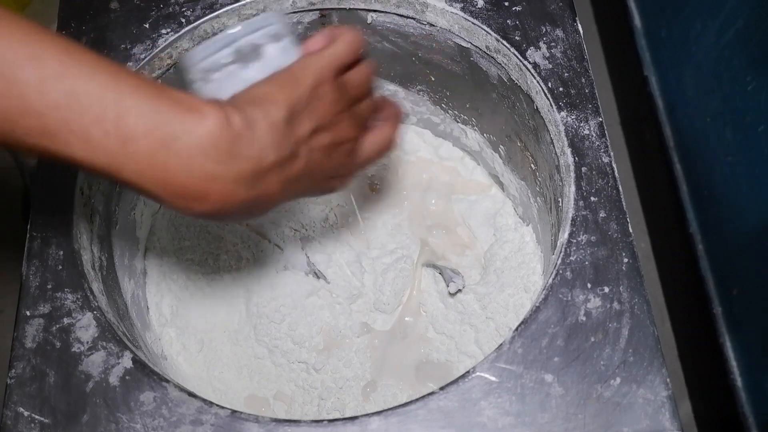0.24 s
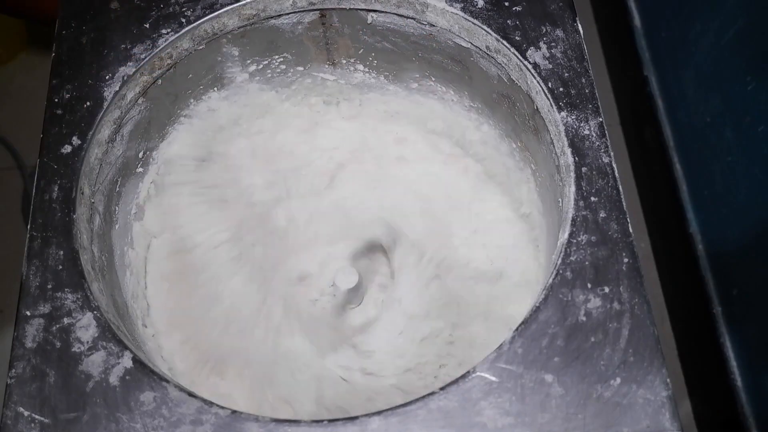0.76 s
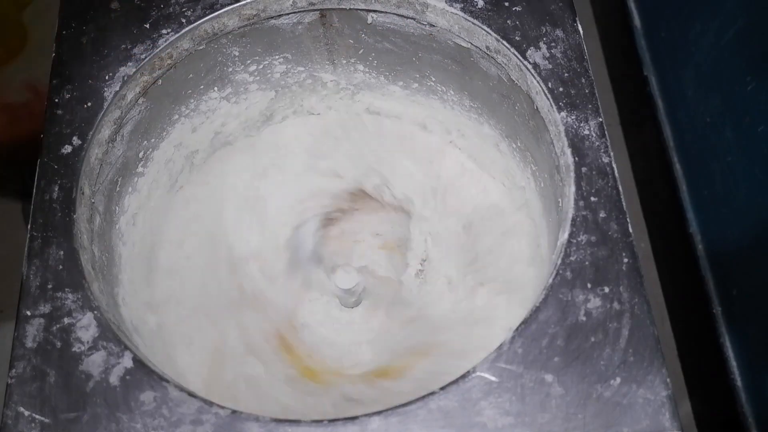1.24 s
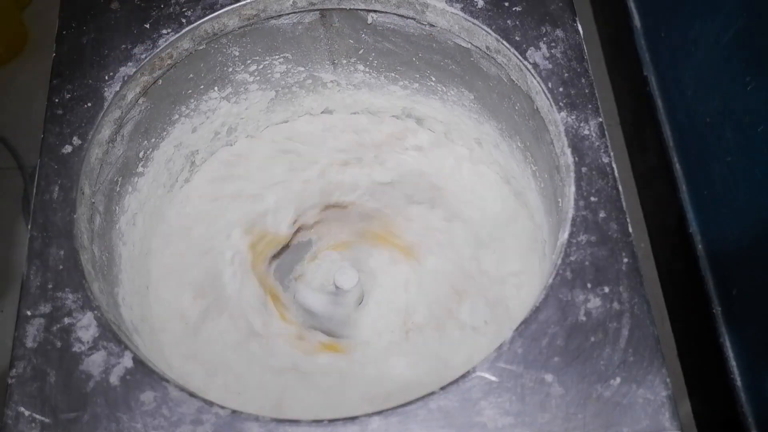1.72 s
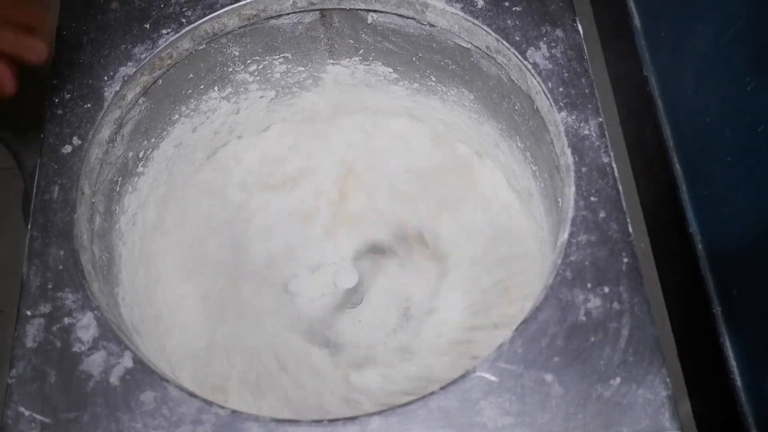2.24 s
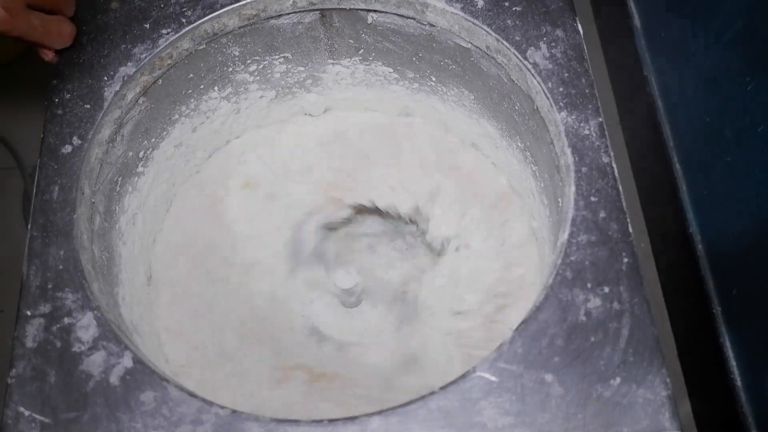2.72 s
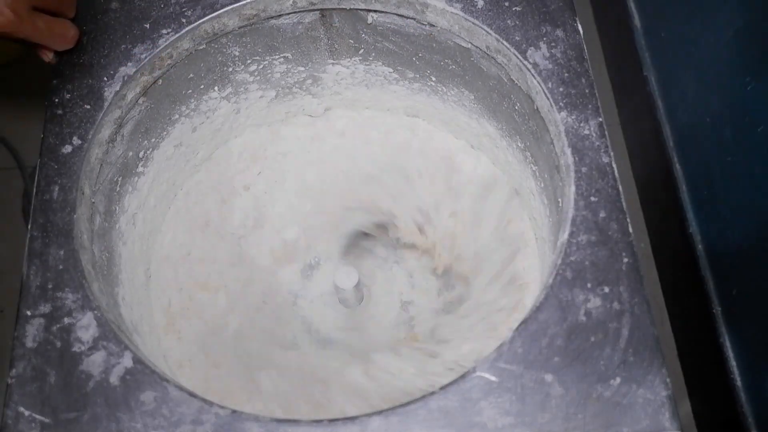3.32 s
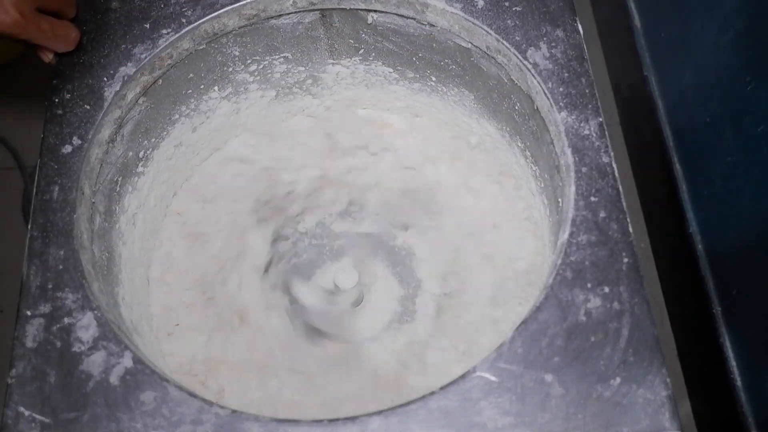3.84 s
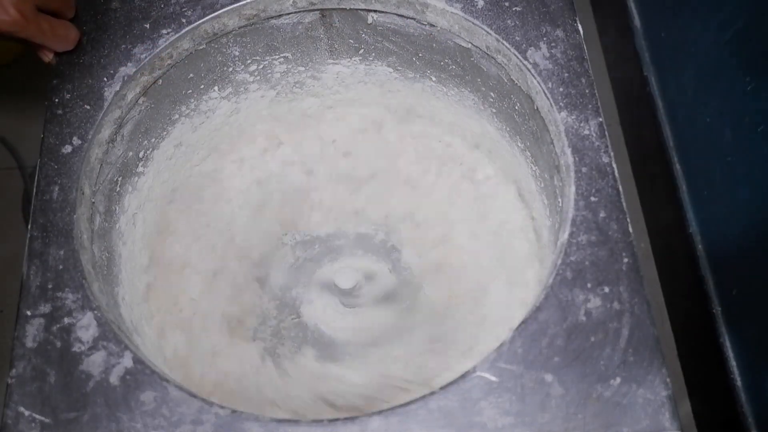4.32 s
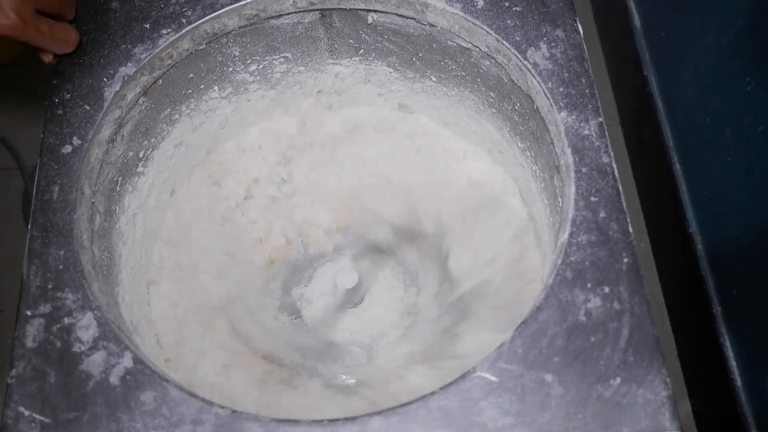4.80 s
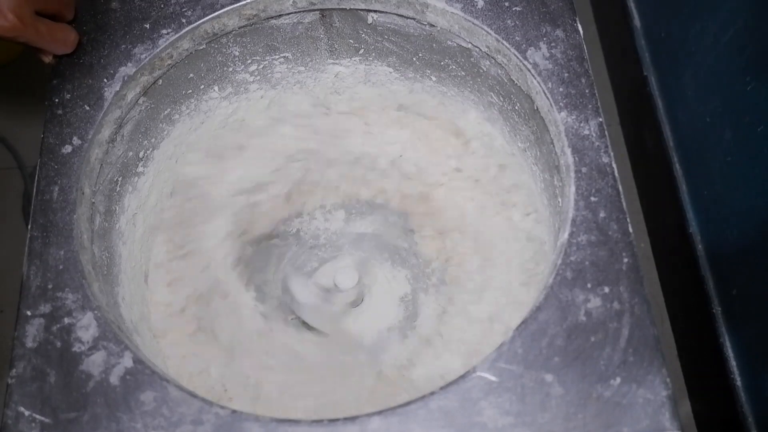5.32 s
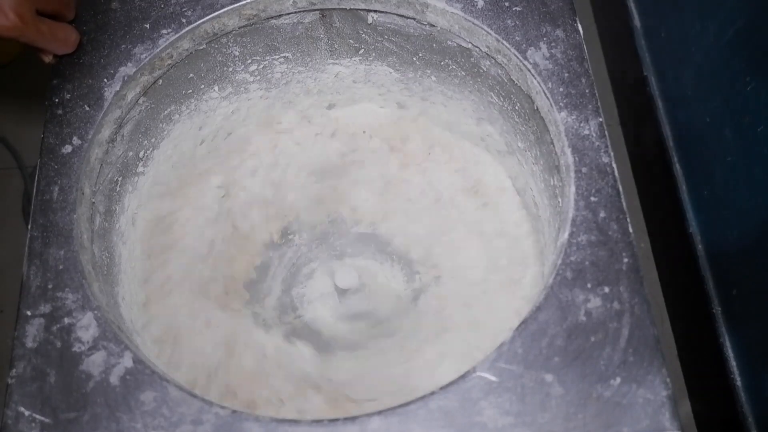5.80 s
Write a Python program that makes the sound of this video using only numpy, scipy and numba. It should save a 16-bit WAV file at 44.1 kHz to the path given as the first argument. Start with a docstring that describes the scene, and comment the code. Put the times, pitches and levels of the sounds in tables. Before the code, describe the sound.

Close up in a kitchen, a dough mixer set in a steel counter starts after some soft metallic taps, with switch clicks, a jolt and a short rush of flour. The motor then hums on steadily under quick, uneven paddle thumps and knocks, while gears whirr, loose parts clack and the metal casing rumbles and buzzes. The left side carries the body of the sound, the right mainly thin buzz.

```python
"""A dough mixer in a steel counter swells to a steady hum, made by the mains tugging at its motor.
First come taps on the steel bowl, a switch, a rush of flour and a jolt as the power comes on.
Then the paddle thumps round the bowl, the gears whirr, loose parts clack, and the sheet-metal casing
rumbles and buzzes. The left side is close and bassy; the right has mostly treble,
with faint low background noise."""
import sys
import numpy as np
from scipy import signal
from scipy.fft import rfft, irfft, next_fast_len
from scipy.io import wavfile
from scipy.ndimage import uniform_filter1d
from numba import njit

SR = 44100
rng = np.random.default_rng(int(sys.argv[2]) if len(sys.argv) > 2 else 0)


def generate_wav(signal):
    """Clip the signal to [-1, 1] and save it as 16-bit WAV at the path in sys.argv[1]."""
    frames = np.transpose(np.atleast_2d(signal))
    scaled = np.clip(frames, -1, 1) * 32767
    pcm = np.round(scaled).astype(np.int16)
    wavfile.write(sys.argv[1], SR, pcm)


N = 267412
STEP = 4  # hum and rumble are built on every fourth sample
PULL_HZ, PULL_START = 99.78, .404  # the motor's magnets pull twice per mains cycle; start is in cycles
SHAFT_HZ = 24.74  # the shaft slips behind a quarter of the pull rate

# All levels are relative. A ring time is how long a sound takes to fall by 60 dB.
# Tone shapes of the noises. Each row: pitch in Hz, level in dB.
LEFT_BACKGROUND_TONE = [(25, -53.5), (60, -23), (100, -18), (135, -8.5), (200, -4), (320, -5), (600, -9),
                        (1000, -18), (2100, -27.5), (5000, -44.5), (14000, -63)]
RIGHT_BACKGROUND_TONE = [(30, -5), (100, -3.5), (220, 1), (500, -6.5), (1000, -12), (2000, -17.5),
                         (3000, -23), (5000, -24.5), (9000, -41), (11800, -45), (12300, -51)]
TAP_TONE = [(300, -17), (650, -14), (950, 0), (1250, -1), (1600, -9), (1900, -5), (2300, -17), (4000, -25),
            (8000, -64)]
FLOUR_TONE = [(2500, 4), (4000, 1), (5000, 6.5), (7000, 0.5), (9000, 2), (11500, 0), (13000, -10.5),
              (15000, -11)]
SWITCH_TONE = [(900, -15), (1500, -7), (1750, 0), (2020, 2.5), (2200, -13), (2400, 1), (2800, -12),
               (3500, -13.5), (6000, -23), (9000, -42), (12000, -68)]
WHIRR_TONE = [(30, -26), (90, -12), (200, -11.5), (380, 1.5), (450, 0), (900, -10.5), (1600, -16),
              (3000, -27), (3900, -29.5), (5000, -62)]
BUZZ_TONE = [(3000, -5.5), (3800, -4.5), (4200, -2.5), (4450, 1.5), (4700, 0), (5200, -3.5), (5500, -0.5),
             (5760, -3), (5950, -1), (6350, -5), (6550, -5.5), (7500, -9.5), (8900, -11), (10100, -11),
             (10800, -9.5), (12000, -12), (12800, -20), (15000, -23)]
CLACK_TONE = [(400, -22.5), (650, 0), (1250, 0), (2200, -8), (3200, -21.5), (5000, -39)]
# Filters for each microphone and for treble heard only on the right. Each row: pitch in Hz, gain in dB.
LEFT_MIC = [(3000, 0), (3450, -1), (3600, -1), (3700, -8), (3900, -5), (4100, 1.5), (4400, 0.5)]
RIGHT_MIC = [(2000, -30), (3300, -10), (4000, 4), (10700, -2.5), (11200, -22.5), (11900, -9), (12300, -30),
             (15000, -34)]
RIGHT_ONLY = [(3000, -1), (4500, -5), (6500, -2), (8000, 1), (11000, 2), (12000, 3)]
# Notes that ring after a blow. Each row: pitch in Hz, level in dB, ring time in seconds.
BOWL_NOTES = [(353, 3.5, 0.26), (324, -4, 0.17), (660, -5, 0.1), (914, -1, 0.21), (1132, -9, 0.19),
              (1175, -14, 1), (1485, -14, 0.13), (1860, -16, 0.15)]
COUNTER_NOTES = [(205.5, -3.5, 0.18), (194.6, -13.5, 0.27), (308, -14, 0.15), (448.6, -15.5, 0.12),
                 (544, -17, 0.1), (623, -11, 0.061), (753, -12, 0.15), (840, -19, 0.15), (1000, -27, 0.063)]
KNOCK_NOTES = [(247, -3, 0.015), (310, -8.5, 0.04), (420, -5, 0.016), (45, -23.5, 0.062)]
# Bands where the casing and loose sheet ring. Each row: pitch in Hz, width in Hz, level in dB.
CASING_BANDS = [(105.1, 15, -20.5), (179.1, 16, 1.5), (206.6, 17, 1.5), (258.6, 32, -2), (306.8, 31.6, -1),
                (355.3, 18, -2.5), (390.2, 43, -6.5), (423, 24, -13), (466, 13, -13), (486, 16, -8),
                (514.5, 14, -4), (590, 25, -9), (626, 104, -14.5), (746, 40, -20.5), (841, 58, -16.5),
                (1114, 28, -19), (1228, 50, -17), (1278, 17, -15.5), (1645, 31, -25), (1815, 36, -23.5),
                (2210, 130, -30.5), (2605, 66, -31), (2970, 70, -38.5), (3260, 55, -35.5), (3460, 200, -42)]
SHEET_BANDS = [(4455, 40, -2), (5510, 260, 0), (6520, 200, -8), (8950, 250, -11), (10800, 350, -10)]
# Overall loudness. Each row: time in seconds, then mixer, left and right background levels in dB.
FADE = [(0, -58, -43, -61), (.2, -42, -41.5, -55), (.4, -50, -35.5, -50.5), (.55, -35, -36, -48),
        (0.679, -37, -25.5, -55.5), (0.751, -13, -30, -58.5), (.85, -5.5, -34, -60), (0.971, 0, -47, -54.5),
        (6.06, -1, -55.5, -55.5)]
# Taps on the bowl. Each row: start in seconds, level in dB, brightness from 0 to 1.
TAPS = [(0.227, -32, 0.37), (.4335, -27, 1), (.4503, -28, 0.3), (0.507, -36, 0.1)]
# The rush of flour. Each row: time in seconds, level in dB.
FLOUR_RUSH = [(.5, -82), (.55, -58), (.61, -51), (.625, -42), (.635, -29.5), (.655, -38), (.7, -45),
              (.78, -54.5), (.9, -66.5)]
# Switch clicks. Each row: start in seconds, level in dB, ring time in seconds.
CLICKS = [(0.538, -35.5, 0.2), (0.55, -31, 0.032), (.57, -36, 0.035), (0.649, -25, 0.053),
          (0.659, -26, 0.053), (0.691, -39, 0.38)]
# Power-on jolts, drive clacks and paddle knocks. Each row: start in seconds, level in dB.
JOLTS = [(.555, -11), (.584, -17.5), (.606, -10), (.63, -19.5), (.680, -30.5)]
CLACKS = [(0.988, -27), (1.196, -32), (1.428, -20.5), (1.929, -35), (2.096, -22), (2.259, -23),
          (2.398, -33), (2.547, -33), (2.641, -30), (2.719, -29), (2.898, -29), (3.099, -26), (3.251, -34),
          (3.317, -33), (3.518, -31), (3.651, -30), (3.769, -28), (4.241, -19), (4.399, -22), (4.421, -29),
          (4.505, -29), (4.56, -26), (4.791, -27), (4.849, -24), (4.933, -29), (4.994, -26), (5.082, -27),
          (5.475, -28), (5.556, -32), (5.692, -26), (5.949, -33)]
KNOCKS = [(1.674, 0), (1.882, -15), (2.283, -23), (2.524, -21), (2.774, -19), (2.930, -10), (3.336, -18),
          (3.616, -12), (4.267, -8), (4.468, -14), (4.869, -2), (5.109, -16), (5.482, -11), (5.721, -19),
          (5.961, -24)]
# Hum tone levels in dB: about one shaft rate apart from the 5th up, then pull multiples from the 11th up.
SHAFT_TONES_DB = [-35.5, -47.5, -23.5, 2, -8.5, -37, -29, -7.5, -13.5, -38, -24, -10.5, -39.5, -37, -29,
                  -16, -35, -26.5, -30.5, -12.5, -47, -40, -55, -22.5, -43, -41.5, -40, -36.5, -40, -37.5,
                  -52, -34, -49.5, -43, -52.5, -34.5]
PULL_TONES_DB = [-36, -43.5, -38.5, -50.5, -33.5, -44, -52, -44.5, -42, -41.5, -54.5, -44.5, -58.5, -42.5,
                 -52, -41.5, -47.5]
# The mixer between strokes. Each row: time in seconds, then hum, whirr and buzz levels in dB.
RUNNING = [(1.0, -21.5, -44, -59.5), (1.63, -21.5, -44.5, -52), (2.26, -22.5, -45.5, -56),
           (2.9, -21.5, -44.5, -52), (3.53, -21.5, -43.5, -56.5), (4.16, -21.5, -46, -58.5),
           (4.79, -23, -44.5, -58), (5.43, -21, -44.5, -58.5), (6.06, -23, -47, -58)]
# Swells in the highest part of the buzz. Each row: time in seconds, rise in dB.
TOP_SWELLS = [(1.046, 0.5), (1.305, 1), (1.43, 1), (1.535, 2.5), (1.665, -2), (1.745, 0), (1.867, 5),
              (2.078, 3), (2.267, 7), (2.437, 3), (2.517, 5), (2.638, 4), (2.717, 4), (2.918, 3), (3.0, -1),
              (3.118, 7), (3.329, 5), (3.405, 5.5), (3.609, 2), (3.769, 1), (3.89, 2.5), (4.051, 6),
              (4.252, 2), (4.332, 4), (4.461, 9), (4.671, 7), (4.854, 7), (4.974, 6), (5.062, 6),
              (5.105, 3.5), (5.264, 8), (5.353, 6.5), (5.549, 4), (5.682, 6), (5.785, 5), (5.954, 6.5)]
# Paddle strokes past the bowl wall. Each row: time in seconds, then load, thump and hum swing in dB,
# how early the gears strain in seconds, then whirr rise and buzz rise in dB.
STROKES = [(1.064, -2.5, 9, -0.5, 0.013, -1.5, 3), (1.267, 6.5, 5.5, -1, -0.068, 4, 1),
           (1.489, 5, 4.5, 2, -0.055, 5, 1.5), (1.676, 3.5, 16.5, 1.5, 0.023, 4, 0.5),
           (1.889, -8, 18, 4.5, 0.0065, 3.5, -1), (2.117, 11.5, 1, -1, 0.039, 5, 1.5),
           (2.29, 10, -1, 4, 0.013, 5.5, 2.5), (2.526, -6, 21.5, 3.5, -0.012, 4, 1),
           (2.77, -2, 15, 1, 0.038, 3, 0.5), (2.956, 6, 12, 4, 0.018, 3, 0),
           (3.18, 9.5, 1, -0.5, 0.039, 3, 0), (3.399, 10, -1, 0, 0.092, 2.5, 2.5),
           (3.613, 11.5, -2, 0.5, 0.016, 1, 4), (3.806, 2.5, 15, 3, -0.041, .5, 2.5),
           (4.057, 14.5, -3, 0, 0.011, 5, 2.5), (4.253, 7, 11, 0, 0.029, 8.5, 8),
           (4.463, 12.5, 3.5, 0.5, -0.04, 4.5, 5.5), (4.679, 9.5, -3, 2.5, -0.02, 2, 3.5),
           (4.872, 11, 4, 4, -0.0025, 5, 2.5), (5.108, 11, 9, -4.5, 0.027, 5, 5.5),
           (5.314, 12.5, -1, -1.5, -0.0025, 4.5, 4.5), (5.534, 13.5, -5, .5, -0.0014, 1.5, 3.5),
           (5.743, 13, 0, 1, 0.025, 5, 4), (5.953, 11.5, 7.5, 6.5, 0.014, 6, 4.5)]


def undb(db):
    """Turn decibels into a gain."""
    return 10 ** (np.asarray(db) / 20)


def unit(x):
    """Scale a sound to an average (rms) level of 1."""
    return x / np.sqrt(np.mean(x ** 2))


def curves(t, table):
    """Join a table's rows with straight lines: one curve for each column after the time."""
    times, *columns = np.transpose(table)
    return [np.interp(t, times, column) for column in columns]


def colour(x, points, turn=1):
    """Filter by (Hz, dB) points; turn=1j moves every wave a quarter cycle ahead."""
    hz, db = np.transpose(points)
    size = next_fast_len(N)
    freqs = np.arange(size // 2 + 1) * SR / size + 1
    gain = undb(np.interp(np.log(freqs), np.log(hz), db))
    return irfft(rfft(x, size) * gain * turn, size)[:N]


def noise(tone):
    """Noise with the given tone shape, at level 1."""
    return unit(colour(rng.standard_normal(N), tone))


def wander(rate, step=1):
    """A smooth random drift of about 1 either way, with `rate` new values a second."""
    held = np.repeat(rng.standard_normal(int(N / SR * rate) + 2), 16)
    smooth = 1.3 * uniform_filter1d(uniform_filter1d(held, 16), 16)
    return np.interp(np.arange(0, N, step) / SR * rate * 16, np.arange(len(smooth)), smooth)


def ring(x, hz, width, rate=SR):
    """Keep a narrow band round one pitch, at level 1."""
    b, a = signal.iirpeak(hz, hz / width, rate)
    return unit(signal.lfilter(b, a, signal.lfilter(b, a, x)))


def burst(start_s, db, rise_s, ring_s):
    """A loudness curve that jumps up and dies away."""
    out, i, t = np.zeros(N), int(start_s * SR), np.arange(SR // 2) / SR
    shape = (1 - np.exp(-t / rise_s)) * np.exp(-np.log(1000) * t / ring_s)
    out[i:i + len(t)] = undb(db) * shape[:N - i]
    return out


def bumps(t, peaks_s, heights_db, rise_s, fall_s):
    """A curve in dB with a bell-shaped bump at each peak."""
    since = t[::64, None] - peaks_s
    bells = np.exp(-(since / np.where(since < 0, rise_s, fall_s)) ** 2 / 2)
    return np.interp(t, t[::64], bells @ heights_db)


def strike(blows, notes, contact_s):
    """Each blow rings the notes, which swell during the contact; a dull blow has weaker high notes."""
    out, t = np.zeros(N + SR), np.arange(SR // 2) / SR
    hz, note_db, ring_s = np.transpose(notes)[:, :, None]
    swell = (1 - np.exp(-t / contact_s)) ** 2
    rings = swell * np.exp(-np.log(1000) * t / ring_s) * np.sin(2 * np.pi * hz * t)
    for s, db, *bright in blows:
        dull_db = -12 * (1 - bright[0]) * np.log2(hz / hz[0]) if bright else 0
        out[int(s * SR):int(s * SR) + len(t)] += undb(db + note_db + dull_db)[:, 0] @ rings
    return out[:N]


def background(tone, flicker_hz):
    """Low background noise whose level flickers a little."""
    return undb(wander(flicker_hz)) * noise(tone)


def bowl_taps():
    """Each tap on the steel bowl gives a sharp tick, ringing notes and a short rattle."""
    rattle = sum(bright * burst(s, db - 8, rise_s=.001, ring_s=.37) for s, db, bright in TAPS)
    tick = sum(bright ** 4 * burst(s - .0015, db - 17, .0002, .006) for s, db, bright in TAPS)
    notes = strike(TAPS, BOWL_NOTES, contact_s=.001)
    return notes + rattle * noise(TAP_TONE) + tick * rng.standard_normal(N)


def flour(t):
    """Flour hisses briefly as it is thrown round."""
    return undb(np.interp(t, *np.transpose(FLOUR_RUSH))) * noise(FLOUR_TONE)


def switch():
    """The switch scrapes and snaps in short bursts of noise."""
    return sum(burst(s, db, .0012, ring_s) for s, db, ring_s in CLICKS) * noise(SWITCH_TONE)


def jolts():
    """The casing jolts as power comes on and rings the counter; it is too small to give off deep bass."""
    return colour(strike(JOLTS, COUNTER_NOTES, contact_s=.00085), [(100, -14), (170, 0)])


def motor_hum(t, hum_db, load_db):
    """Magnetic pulls make a stack of tones; the shaft adds tones beside them, belt and gear one each."""
    steady_db = hum_db.mean()
    belt = undb(-33) * np.sin(2 * np.pi * 105.82 * t)
    gear = undb(-25 + 3.8 * wander(7.6, STEP)) * np.sin(2 * np.pi * 516.86 * t)
    out = undb(steady_db) * (belt + gear)
    pulls, turns = PULL_START + PULL_HZ * t, .37 + SHAFT_HZ * t
    late_db = -6 * np.clip((1.3 - t) / .5, 0, 1)  # the high tones come in last
    tones = list(enumerate(SHAFT_TONES_DB, start=5))
    tones += [(4 * k, db) for k, db in enumerate(PULL_TONES_DB, start=11)]
    for k, db in tones:  # tone k lies near k times the shaft rate
        multiple, side = (k + 1) // 4, (k + 1) % 4 - 1
        load_share = .85 if k < 15 else .65 if k < 18 else .12
        drive_db = hum_db if k < 10 else steady_db + load_share * load_db + (k > 18) * late_db
        waver_db = (.4 if k == 8 else .8 if k in (9, 24) else 1.1 if k < 18 else 2.4) * wander(11, STEP)
        casing_lag = .458 * multiple ** 2
        cycles = multiple * pulls + casing_lag + side * turns
        wobble = (.24 if k < 40 else .9) * waver_db[::-1]
        out += undb(db + drive_db + waver_db) * np.cos(2 * np.pi * cycles + wobble)
    return np.sqrt(2) * out


def casing_rumble(load_db, whirr_db, pulses):
    """Noise rings in the casing: the low bands follow the paddle, the high ones the gears."""
    out = 0
    for hz, width, db in CASING_BANDS:
        drive_db = .53 * load_db if 230 < hz < 450 else .26 * (load_db + whirr_db) if hz < 750 else whirr_db
        band = ring(rng.standard_normal(len(load_db)), hz, width, SR / STEP)
        if hz > 750:  # high bands beat with the magnetic pulls
            band *= 1 + .3 * (pulses - pulses.mean())
        out += band * undb(db + 10 * np.log10(width / 30) + drive_db + 1.4 * wander(15, STEP))
    return undb(-25.5) * out


def gear_whirr(whirr_db, pulses):
    """The gears make a broad noise that throbs with the magnetic pulls."""
    return undb(-28 + whirr_db + .65 * wander(18)) * (.61 + .63 * pulses) * noise(WHIRR_TONE)


def rattle_pulses(t):
    """A loudness curve: each magnetic pull shakes the loose sheet with its own strength."""
    pulls = 1 + PULL_START + PULL_HZ * t - .45  # the sheet lags the pull
    strength = undb(2.2 * rng.standard_normal(int(pulls[-1]) + 9))[pulls.astype(int)]
    decay = np.exp(-(pulls % 1) / .2)
    return unit(.5 + uniform_filter1d(strength * decay, size=130))


def sheet_buzz(pulses, buzz_db, top_db):
    """Loose sheet metal rattles in pulses and rings on; the top comes and goes more than the rest."""
    shaking = pulses * rng.standard_normal(N)
    ringing = sum(undb(db) * ring(shaking, hz, width) for hz, width, db in SHEET_BANDS)
    rattle = unit(unit(colour(shaking, BUZZ_TONE)) + undb(-15) * unit(ringing))
    top = signal.sosfiltfilt(signal.butter(2, 7340, "high", fs=SR, output="sos"), rattle)
    return undb(3 + buzz_db + .075 * top_db) * (rattle + (undb(top_db) - 1) * top)


def drive_clacks():
    """Loose parts of the drive clack, each a quick burst of noise."""
    return sum(burst(s, db - 6.5, rise_s=.0015, ring_s=.083) for s, db in CLACKS) * noise(CLACK_TONE)


def paddle(t):
    """Level curves in dB: strokes load the casing, swing the hum, and build up the whirr and buzz."""
    hum_db, whirr_db, buzz_db = curves(t, RUNNING)
    s, load, thump, swing, lead, whirr_rise, buzz_rise = np.transpose(STROKES)
    hum_db -= bumps(t, s - .073, swing, .019, .019)  # on most strokes the hum sags...
    hum_db += bumps(t, s - .016, swing, .019, .019)  # ...then swells
    load_db = -30.5 + bumps(t, s, load, .026, .026) + bumps(t, s, thump, .0042, .013)
    whirr_db += bumps(t, s - lead - .012, whirr_rise, rise_s=.058, fall_s=.027)
    buzz_db += bumps(t, s - lead, buzz_rise, rise_s=.15, fall_s=.042)
    normal_load_db, normal_whirr_db = -27, -39.5
    return hum_db, load_db - normal_load_db, whirr_db - normal_whirr_db, buzz_db


def paddle_knocks():
    """The hardest strokes end in a short knock through the casing."""
    return strike(KNOCKS, KNOCK_NOTES, contact_s=.0012)


def scene():
    """Left: everything, close. Right: treble a quarter cycle ahead, a trace of bass, faint low noise."""
    t = np.arange(N) / SR
    mixer_gain, left_noise_gain, right_noise_gain = undb(curves(t, FADE))
    hum_db, load_db, whirr_db, buzz_db = paddle(t)
    pulses = rattle_pulses(t)
    hum = undb(5) * motor_hum(t[::STEP], hum_db[::STEP], load_db[::STEP])
    rumble = casing_rumble(load_db[::STEP], whirr_db[::STEP], pulses[::STEP])
    machine = signal.resample_poly(hum + rumble, STEP, 1)[:N] + gear_whirr(whirr_db, pulses)
    body = mixer_gain * machine + bowl_taps() + switch() + jolts() + drive_clacks() + paddle_knocks()
    top_db = -2 + bumps(t, *np.transpose(TOP_SWELLS), .027, .027) + .7 * wander(19)
    scrapes = undb(1.5 * wander(45))  # short scrapes come and go in the rattle
    treble, right_treble = (mixer_gain * sheet_buzz(scrapes * pulses, buzz_db, top_db) + flour(t)
                            for _ in range(2))
    left = colour(body + treble, LEFT_MIC)
    left += left_noise_gain * background(LEFT_BACKGROUND_TONE, flicker_hz=9.1)
    right = undb(-4.5) * colour(treble + colour(right_treble, RIGHT_ONLY), RIGHT_MIC, turn=1j)
    right += colour(body, [(150, -44.5), (300, -44.5), (600, -70)], turn=-1j)
    right += right_noise_gain * background(RIGHT_BACKGROUND_TONE, flicker_hz=30)
    return np.array([left, right])


@njit
def limiter(x, limit, attack_s, release_s):
    """Turn the sound down just after a peak passes the limit, then let it creep back."""
    rise, fall = 1 / (attack_s * SR), np.exp(-1 / (release_s * SR))
    out, level = np.empty(len(x)), 0.
    for i in range(len(x)):
        level = level + rise * (abs(x[i]) - level) if abs(x[i]) > level else level * fall
        out[i] = x[i] * limit / max(level, limit)
    return out


def record(dry):
    """The microphone drops the deep bass; peaks are turned down and rounded, and the very top is cut."""
    thin = signal.sosfilt(signal.butter(2, 70, "high", fs=SR, output="sos"), dry)
    limited = np.array([limiter(x, limit=.44, attack_s=.0022, release_s=.077) for x in thin])
    rounded = limited / (1 + (limited / .82) ** 8) ** (1 / 8)
    return signal.sosfilt(signal.ellip(8, .2, 70, 15100, fs=SR, output="sos"), rounded)


dry = scene()
out = record(dry)
generate_wav(out)
```